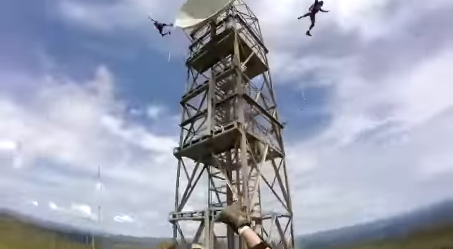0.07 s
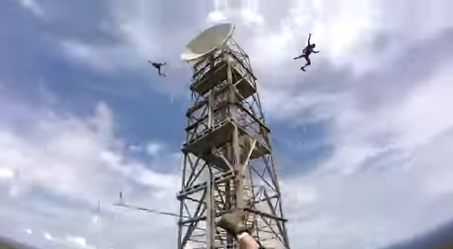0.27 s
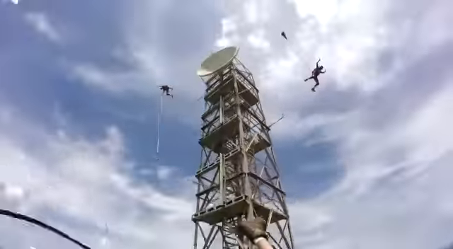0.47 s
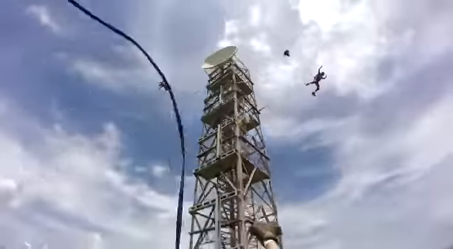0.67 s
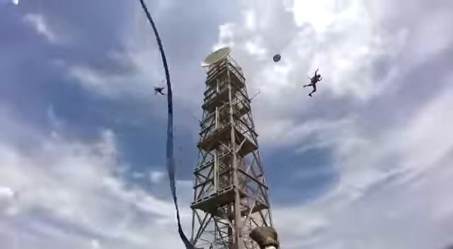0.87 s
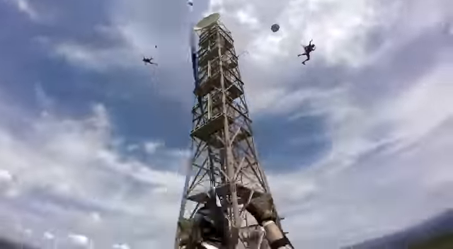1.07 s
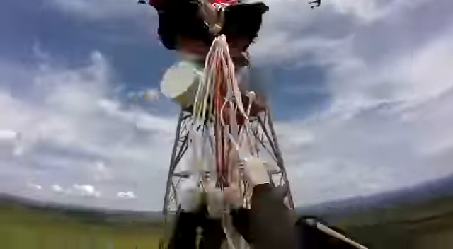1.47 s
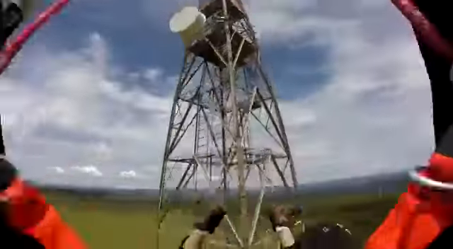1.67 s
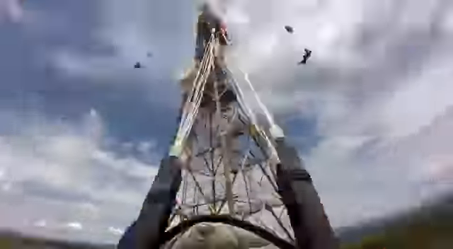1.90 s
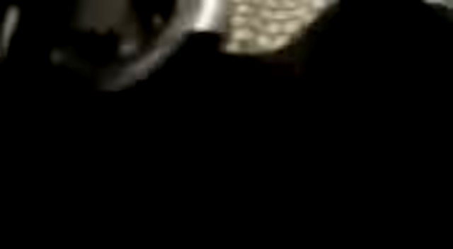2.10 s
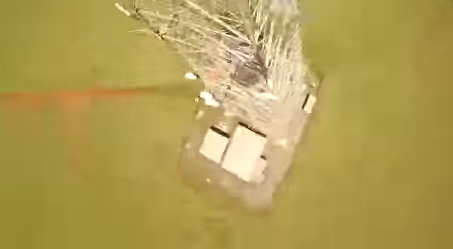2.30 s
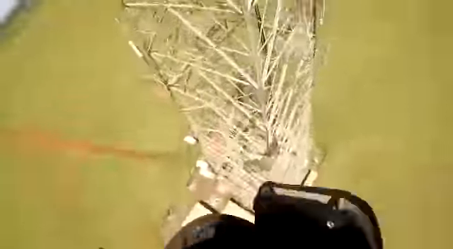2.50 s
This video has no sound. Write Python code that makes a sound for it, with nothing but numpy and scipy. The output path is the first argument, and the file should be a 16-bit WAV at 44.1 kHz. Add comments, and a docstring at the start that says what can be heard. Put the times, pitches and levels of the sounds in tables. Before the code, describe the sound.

Wind rushes over the microphone in a fall, then a parachute cracks open with clacking buckles.

```python
"""Tower jump and parachute opening

A jumper falls with a camera on the helmet. Air rushes over the housing, rings its cavity and
buffets the microphone. The parachute is dragged out, then opens: cloth cracks, the risers knock
the helmet, buckles clack and overload the recorder, and the wind drops to a glide."""
import sys
import numpy as np
from scipy import signal
from scipy.fft import rfft, irfft
from scipy.io import wavfile
from scipy.ndimage import map_coordinates

SR = 44100
rng = np.random.default_rng(int(sys.argv[2]) if len(sys.argv) > 2 else 0)


def wrap_up_sound(samples):
    """Save the sound to the file named by the first command line argument, as 16-bit audio."""
    columns = np.atleast_2d(samples).T
    # keep every value between -1 and 1, then stretch to whole-number steps
    tamed = np.clip(columns, -1, 1)
    steps = np.round(tamed * 32767).astype(np.int16)
    wavfile.write(sys.argv[1], SR, steps)


N = 116865
T = np.arange(N) / SR


def amp(db):
    """Decibels to gain."""
    return 10 ** (np.asarray(db) / 20)


def unit(x):
    """Scales to rms 1."""
    return x / np.sqrt(np.mean(x ** 2) + 1e-20)


def curve(rows, column=1):
    """One column of a time table at every sample."""
    rows = np.array(rows)
    return np.interp(T, rows[:, 0], rows[:, column])


def add(mix, start_s, sound):
    """Mixes a sound in at start_s."""
    part = mix[max(round(start_s * SR), 0):][:len(sound)]
    part += sound[:len(part)]


def colour(x, spectrum, size=8192, rolloff_db_per_octave=24):
    """Minimum-phase filter of unit energy, rolling off above the spectrum's last point."""
    hz, db = np.transpose(spectrum)
    bin_hz = abs(np.fft.fftfreq(size, 1 / SR)) + 1
    octaves_above = np.maximum(np.log2(bin_hz / hz[-1]), 0)
    gain_db = np.interp(np.log(bin_hz), np.log(hz), db) - rolloff_db_per_octave * octaves_above
    log_response = np.conj(signal.hilbert(np.log(amp(gain_db) + 1e-6)))
    taps = np.fft.ifft(np.exp(log_response)).real[:size // 2] * np.hanning(size)[size // 2:]
    return signal.fftconvolve(x, taps / np.linalg.norm(taps))[:N]


def wander(rate_hz):
    """Random drift of rms 1, mostly below rate_hz."""
    ratio = np.fft.rfftfreq(N, 1 / SR) / rate_hz
    return unit(irfft(rfft(rng.standard_normal(N)) * ratio / (1 + ratio ** 2) ** 2, N))


def bump(centre_s, width_s):
    """Gaussian hump, peak 1."""
    return np.exp(-((T - centre_s) / width_s) ** 2)


def strike(rise_s, decay_s):
    """Envelope with a quick rise and an exponential fall, peak 1."""
    t = T[:SR // 5]
    shape = (1 - np.exp(-(t / rise_s) ** 2)) * np.exp(-t / decay_s)
    return shape / shape.max()


def ring(pitch_hz, rise_s, decay_s):
    """One decaying mode."""
    shape = strike(rise_s, decay_s)
    return shape * np.sin(2 * np.pi * pitch_hz * T[:len(shape)])


def turbulence(eddies_per_s=980, spread_db=6, eddy_share=0.34):
    """Smooth noise mixed with the pops of single eddies."""
    pops = rng.choice([-1., 1.], N) * (rng.random(N) < eddies_per_s / SR)
    pops *= amp(spread_db * np.minimum(rng.exponential(1, N), 3.3))
    return np.sqrt(1 - eddy_share) * rng.standard_normal(N) + np.sqrt(eddy_share) * unit(pops)


def friction_bursts(rows, spectrum, rise_s, taut_s=0.011, taut_db=-11.5, crinkle_db=3.5):
    """Crinkly noise bursts, each led in by the rustle of cloth drawing taut."""
    envelope = np.zeros(N)
    for start_s, level_db, decay_s in rows:
        add(envelope, start_s, amp(level_db) * strike(rise_s, decay_s))
    pole = np.exp(-1 / (taut_s * SR))
    lead_in = amp(taut_db) * signal.lfilter([1 - pole], [1, -pole], envelope[::-1])[::-1]
    crinkle = unit(amp(crinkle_db * wander(640)))
    return colour((envelope + lead_in) * crinkle * rng.standard_normal(N), spectrum)


# Hush spectrum: freq_hz, density_db
HUSH_SPECTRUM = [(40, 17), (110, -4), (330, -10), (560, -20), (720, -22), (1150, -20), (1460, 5.5),
                 (1850, -16), (2550, -1.5), (3150, -13.5), (3850, -6.5), (4400, -29), (6600, -26.5),
                 (7400, -22.5), (8300, -33.5), (12000, -44)]
# Hush envelope: time_s, level_db
HUSH_LEVEL = [(0, -57), (2.262, -43), (2.28, -35.5), (2.34, -32), (2.39, -40), (2.42, -38), (2.46, -41.5),
              (2.57, -44.5), (2.62, -45.5)]


def glide_hush(flutter_db):
    """Soft turbulence that swells to a swish under the open canopy."""
    return colour(turbulence(), HUSH_SPECTRUM) * amp(curve(HUSH_LEVEL) + flutter_db)


# Rumble spectrum: freq_hz, density_db
RUMBLE_SPECTRUM = [(10, -66), (25, -7), (45, 7), (68, 11), (95, -8), (300, -59.5)]
# Rumble envelope: time_s, level_db
RUMBLE_LEVEL = [(0, -44), (.2, -30.5), (.5, -29), (1.02, -25), (1.12, -16.5), (1.3, -19.5), (1.5, -23.5),
                (2.33, -28.5), (2.42, -34.5), (2.53, -33.5), (2.65, -56)]


def rumble():
    """The deep end of the turbulence."""
    return unit(colour(turbulence(), RUMBLE_SPECTRUM)) * amp(curve(RUMBLE_LEVEL))


# Hiss spectrum: freq_hz, density_db
HISS_SPECTRUM = [(3500, -11), (4800, -7), (5230, -8), (5560, 6.5), (6000, 1), (6900, 0.5), (7400, 3.5),
                 (8100, -4), (9100, -4.5), (14500, -24)]


def housing_hiss(rush_db, flutter_db, lull, full_speed_db=-43, growth_db_per_db=1.32):
    """Hiss grows faster with speed than the rush; the canopy chops it, flapping as it is dragged out."""
    level_db = full_speed_db + growth_db_per_db * (rush_db - rush_db.max())
    flapping_db = 2.5 * bump(1.296, width_s=0.078) * (1 + wander(64)) - 12.5 * lull
    return colour(rng.standard_normal(N), HISS_SPECTRUM) * amp(level_db + flutter_db + flapping_db)


# Buffeting spectrum: freq_hz, density_db
BUFFET_SPECTRUM = [(50, -15), (100, 1.5), (180, -1), (290, 0.5), (360, -6), (480, -20), (1200, -48)]


def buffeting(eddies, level_db):
    """Eddies shake the microphone."""
    return colour(eddies, BUFFET_SPECTRUM) * amp(level_db)


# Cavity spectrum in the clean stream: freq_hz, density_db
STREAM_SPECTRUM = [(200, -16.5), (520, -12), (850, -17.5), (1180, -15.5), (1340, -2), (1460, 1), (1580, -3),
                   (1800, -14), (2150, -17.5), (2520, -9), (2900, -15.5), (3330, -21.5), (3650, -17),
                   (4500, -32)]
# Spectrum in the wake of the cloth: freq_hz, density_db
WAKE_SPECTRUM = [(200, -20), (400, 2.5), (540, -18.5), (780, -14.5), (1050, -3.5), (1200, -6), (1430, 4),
                 (1670, -7.5), (1860, 2), (2080, -4.5), (2370, 0.5), (2900, -8), (3500, -17), (4600, -27)]
# Crossfade from stream to wake: time_s, power_share
WAKE_SHARE = [(1.25, 0.21), (1.45, 0.91), (1.92, 1), (2.2, .74)]


def cavity_rush(eddies, level_db, pitch_drift=0.00757):
    """Air rings the housing cavity, its pitch drifting in the gusts, until the cloth's wake takes over."""
    cavity = colour(eddies, STREAM_SPECTRUM)
    read_position = np.cumsum(1 + pitch_drift * wander(9.86))
    stream = map_coordinates(cavity, [read_position], mode="mirror")
    wake = colour(rng.standard_normal(N), WAKE_SPECTRUM)
    share = curve(WAKE_SHARE)
    return (np.sqrt(1 - share) * stream + np.sqrt(share) * wake) * amp(level_db)


# Airflow envelopes: time_s, rush_db, buffet_db
AIRFLOW = [(0, -52, -38.5), (.11, -45, -40.5), (.2, -36, -33), (.38, -29, -27.5), (.66, -25.5, -25.5),
           (.84, -21, -21.5), (1.06, -22.5, -22.5), (1.15, -19, -18.5), (1.29, -22, -20), (1.4, -27, -22.5),
           (1.52, -30, -30), (1.63, -28.5, -23), (1.89, -28, -25.5), (1.94, -43.5, -18),
           (1.985, -52.5, -42), (2.02, -38.5, -26), (2.08, -44.5, -67), (2.14, -39, -25), (2.21, -38, -30),
           (2.265, -52, -51), (2.36, -65, -52)]
# Lulls between canopy flaps: centre_s
LULL_TIMES = [1.175, 1.196, 1.288, 1.351, 1.389]


def wind():
    """Five air layers share slow gusts; all but the rumble also share a fast flutter."""
    gust_db, flutter_db = 0.53 * wander(24), wander(108)
    eddies = turbulence()
    rush_db, buffet_db = curve(AIRFLOW), curve(AIRFLOW, column=2)
    lull = sum(bump(centre_s, width_s=0.0072) for centre_s in LULL_TIMES)
    air = cavity_rush(eddies, rush_db + 1.5 * flutter_db - 3.5 * lull)
    air += buffeting(eddies, buffet_db + 0.5 * flutter_db)
    air += rumble() + glide_hush(flutter_db) + housing_hiss(rush_db, flutter_db, lull)
    return amp(gust_db) * air


# Blows on the housing: start_s, level_db, pitch_hz, decay_s
HOUSING_BLOWS = [(.21, -17.5, 60.3, 0.025), (.838, -14, 76, 0.017), (1.3, -15, 59.4, 0.017),
                 (1.401, -15, 71.9, 0.079), (1.631, -8, 56, 0.012), (1.691, -3.5, 66, 0.016),
                 (1.908, -2, 41.6, 0.008), (1.921, -13, 210, 0.0014), (1.941, -13, 180, .004),
                 (1.952, -1.5, 34.7, .008), (2.065, 0, 202, 0.0011), (2.178, -12, 62, .012),
                 (2.18, -13, 190, 0.012), (2.236, 0, 112, 0.0042), (2.285, -23.5, 251, 0.0036),
                 (2.346, -11, 47, 0.013)]


def housing_thumps(rise_cycles=0.31):
    """Air and webbing push the housing, which swings back and settles."""
    out = np.zeros(N)
    for start_s, level_db, pitch_hz, decay_s in HOUSING_BLOWS:
        add(out, start_s, amp(level_db) * ring(pitch_hz, rise_cycles / pitch_hz, decay_s))
    return out


# Strap hits: start_s, level_db, decay_s
STRAP_HITS = [(.0497, -37, 0.0027), (.211, -28, 0.0065), (1.375, -17.5, 0.0047), (1.6375, -13, 0.0015),
              (1.897, -16.5, 0.01), (1.936, -20.5, 0.0044), (1.9675, -21.5, 0.0012), (2.064, -18, 0.0051),
              (2.093, -20.5, 0.0068), (2.175, -17, .0042), (2.183, -19.5, 0.0095), (2.241, -8, 0.0031),
              (2.352, -24.5, 0.0029), (2.405, -45, 0.0079), (2.553, -40, .005)]
# Strap spectrum: freq_hz, density_db
STRAP_SPECTRUM = [(100, -17), (300, -1), (750, -7), (1100, -5), (1420, 7.5), (1800, -4.5), (2500, 3),
                  (3200, -6), (4600, -19), (7300, -26), (15000, -62)]


def strap_slaps():
    """Straps slap and drag over the helmet."""
    return friction_bursts(STRAP_HITS, STRAP_SPECTRUM, rise_s=0.00093)


# Cloth and line snaps: start_s, level_db, decay_s
CLOTH_SNAPS = [(.028, -29.5, 0.0018), (.1023, -44, 0.0063), (.2415, -26.5, 0.00054), (.3095, -30, .00083),
               (.4245, -22.5, 0.0034), (.602, -24, 0.007), (1.115, -35.5, .019), (1.156, -27.5, 0.0055),
               (1.437, -30.5, 0.0012), (1.458, -32, 0.0017), (1.692, -21.5, 0.0015), (1.697, -24.5, 0.0038),
               (1.741, -26.5, .0016), (1.888, -25, .003), (1.897, -15, 0.0012), (1.9076, -7.5, 0.0012),
               (1.9365, -18.5, 0.0006), (2.003, -32.5, 0.003), (2.064, -17.5, 0.0036), (2.131, -40, 0.0072),
               (2.171, -32, .004), (2.192, -37.5, 0.021), (2.2448, -8.5, 0.0011), (2.352, -29, 0.0018)]
# Cloth spectrum: freq_hz, density_db
CLOTH_SPECTRUM = [(200, 15), (900, -0.5), (1500, -20), (2600, 8), (4500, 3), (5800, 2), (7500, -2.5),
                  (10000, -7.5), (14500, -26)]


def cloth_cracks():
    """Cloth and lines rustle, then crack taut."""
    return friction_bursts(CLOTH_SNAPS, CLOTH_SPECTRUM, rise_s=0.00023)


# Buckle and link strikes: start_s, level_db, pitch_hz, decay_s
BUCKLE_HITS = [(0.4039, -10.5, 1450, .0018), (0.8127, -12, 1480, .0018), (1.9071, 1.5, 2215, 0.00067),
               (1.941, -12, 2310, 0.0014), (2.0925, 4.5, 2500, 0.00076), (2.1736, -4.5, 2070, 0.00089),
               (2.2448, -7.5, 2310, .001), (2.511, -30.5, 1510, 0.0059)]
# Housing modes: pitch_hz, gain_db, decay_s
HOUSING_MODES = [(1567, -12, 0.0019), (1800, -24, 0.0097)]


def buckle_clacks(rise_s=0.00074, tick_gain_db=-32, tick_decay_s=0.0004):
    """Each strike makes a hard tick and briefly rings both the buckle and the housing."""
    out = np.zeros(N)
    housing = sum(amp(db) * ring(hz, rise_s, decay_s) for hz, db, decay_s in HOUSING_MODES)
    tick_envelope = amp(tick_gain_db) * strike(rise_s, tick_decay_s)
    for start_s, level_db, pitch_hz, decay_s in BUCKLE_HITS:
        noise = tick_envelope * rng.standard_normal(len(housing))
        tick = signal.lfilter([.5], [1, -.5], noise)  # gentle low-pass
        buckle = ring(pitch_hz, rise_s, decay_s)
        add(out, start_s, amp(level_db) * (buckle + housing + tick))
    return out


def scene():
    """Wind and the opening parachute at one microphone."""
    return (wind() + housing_thumps() + buckle_clacks() + strap_slaps() + cloth_cracks())[None]


def record(dry):
    """The microphone blocks the slowest pressure, the loudest snaps overload it; then the band limit."""
    low_cut_hz, high_cut_hz = 10, 15650
    sound = signal.lfilter(*signal.butter(1, low_cut_hz, "high", fs=SR), dry)
    clipped = sound / (1 + sound ** 6) ** (1 / 6)
    low_pass = signal.firwin(255, high_cut_hz, window=("kaiser", 9), fs=SR)
    return signal.oaconvolve(clipped, low_pass[None], "same")


dry = scene()
out = record(dry)
wrap_up_sound(out)
```